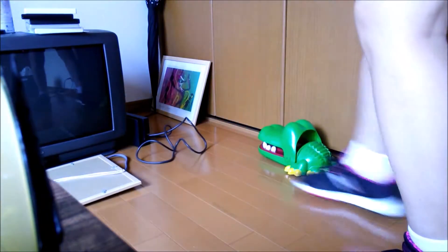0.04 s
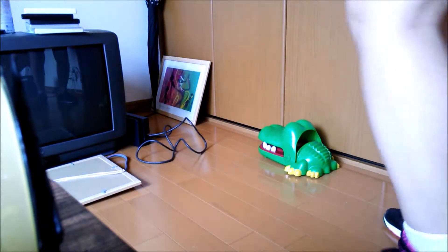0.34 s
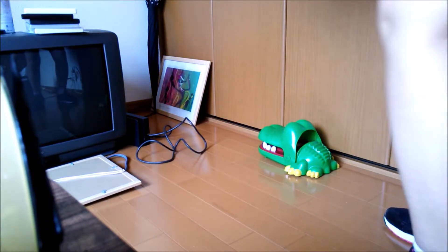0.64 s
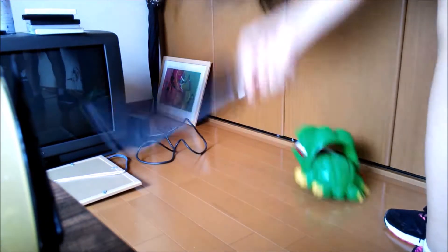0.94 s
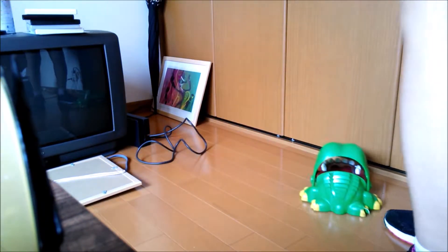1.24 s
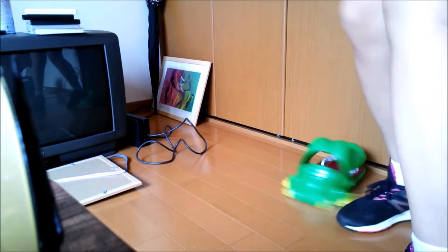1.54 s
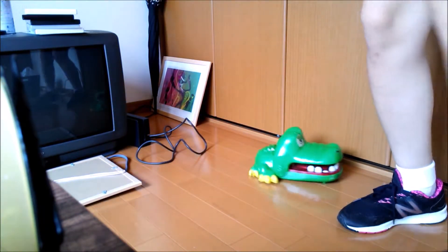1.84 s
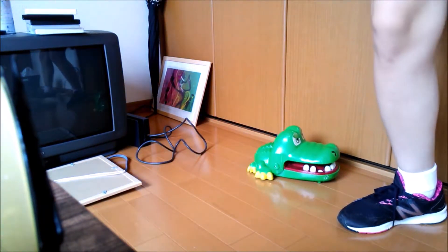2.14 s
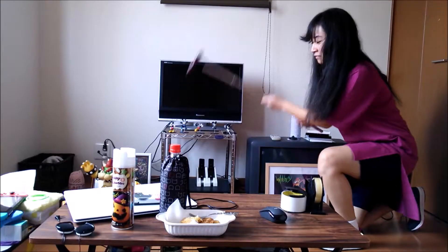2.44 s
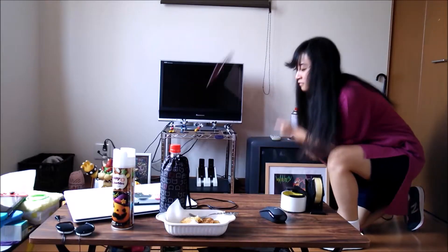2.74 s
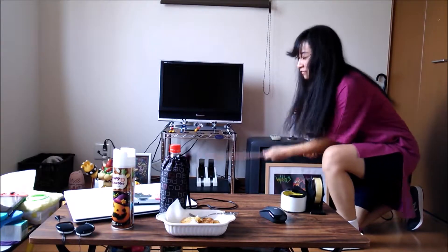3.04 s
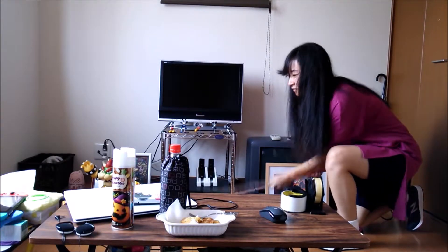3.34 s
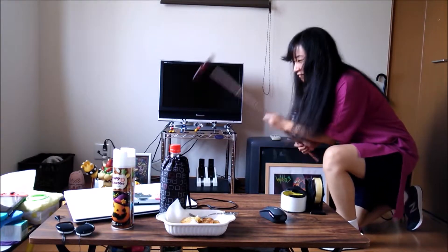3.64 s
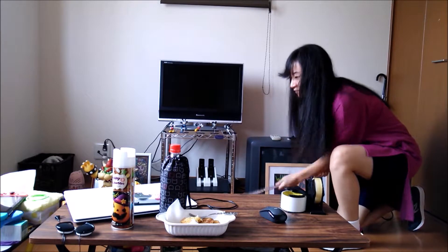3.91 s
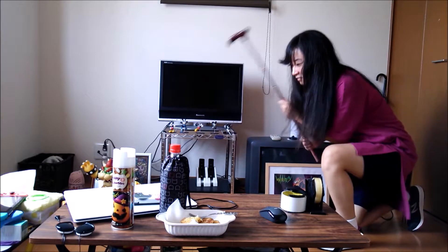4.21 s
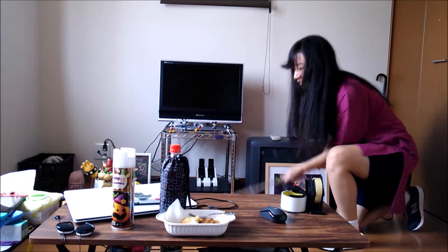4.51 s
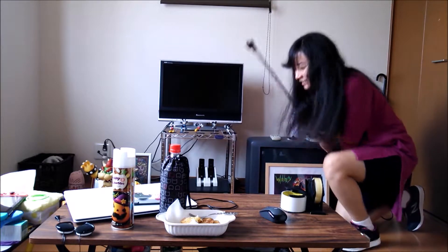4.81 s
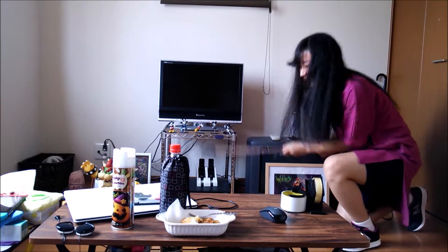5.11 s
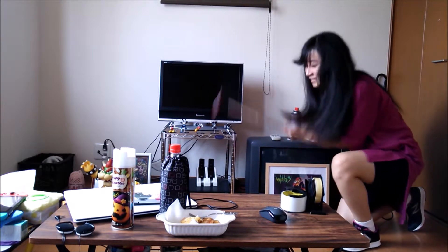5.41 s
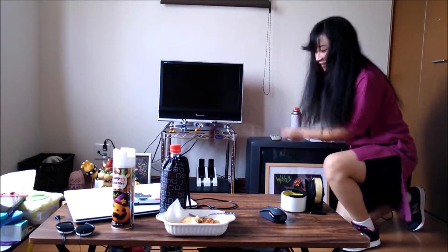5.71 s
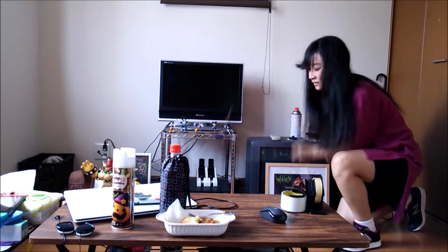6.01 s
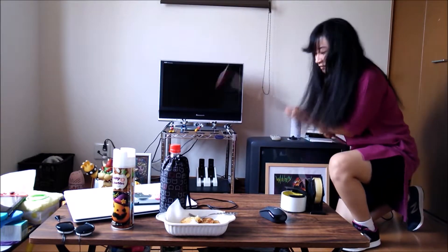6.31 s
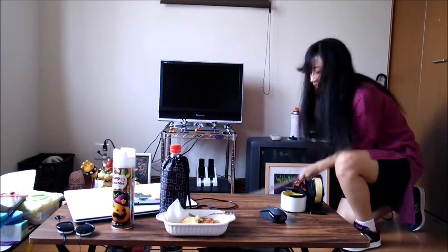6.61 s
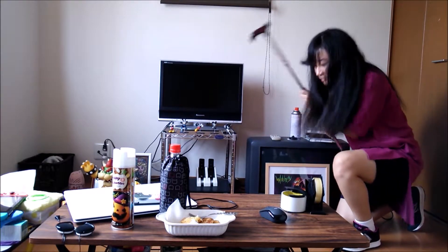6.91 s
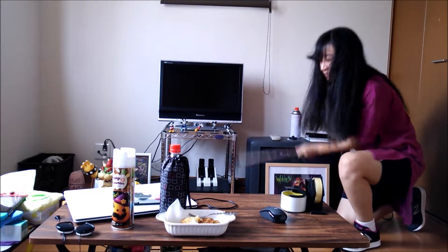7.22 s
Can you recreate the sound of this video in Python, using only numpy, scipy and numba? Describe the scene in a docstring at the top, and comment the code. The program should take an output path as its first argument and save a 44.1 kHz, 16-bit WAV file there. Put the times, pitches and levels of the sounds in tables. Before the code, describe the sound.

A hollow plastic toy clatters across a wooden floor, then takes nine loud, evenly paced hammer blows in a small room.

```python
"""A small bare room with a wooden floor: a hollow plastic toy is flung, nudged with a shoe, then hammered.
Contacts crack the shell and set the room ringing; harder bounces are brighter. After each of nine blows
the toy jumps and lands again. Boards boom under toy and feet, a sole squeaks once, a sleeve rustles.
The microphone is overloaded: its limiter holds loud crashes flat before the room is heard dying away."""
import sys
import numpy as np
from scipy import signal
from scipy.fft import rfft, irfft
from scipy.io import wavfile
from scipy.ndimage import map_coordinates
from numba import njit

SR = 44100
rng = np.random.default_rng(int(sys.argv[2]) if len(sys.argv) > 2 else 0)


def dump(signal):
    """Clip the signal to [-1, 1] and save it as 16-bit WAV at the path in sys.argv[1]."""
    limited = np.clip(np.atleast_2d(signal).T, -1, 1)
    pcm = np.round(limited * 32767).astype(np.int16)
    wavfile.write(sys.argv[1], SR, pcm)


N = 320166
TIME_S = np.arange(N) / SR
RING_S = np.arange(SR) / SR  # time axis of one event
HZ = np.fft.rfftfreq(SR, 1 / SR)
DIP_START_S, DIP_END_S = 2.502, 2.535


def amp(db):
    """Decibels to gain."""
    return 10 ** (np.asarray(db) / 20)


def unit(x):
    """Scale to rms 1."""
    return x / np.sqrt(np.mean(x ** 2) + 1e-20)


def along(points, hz):
    """Interpolate (f/Hz, value) points on a log axis."""
    f, values = np.transpose(points)
    return np.interp(np.log(hz + 1), np.log(f + 1), values)


def add(track, t_s, sound):
    """Mix a sound into the track from t_s."""
    start = max(round(t_s * SR), 0)
    part = sound[:max(N - start, 0)]
    track[start:start + len(part)] += part


def noise(spectrum):
    """Steady coloured noise, rms 1."""
    colour = amp(along(spectrum, np.fft.rfftfreq(N, 1 / SR)))
    return unit(irfft(rfft(rng.standard_normal(N)) * colour, N))


def resonances(modes):
    """Sum of resonance peaks in dB, from rows of f/Hz, width/Hz, level/dB."""
    return sum(db / (1 + (2 * (HZ - hz) / width_hz) ** 2) for hz, width_hz, db in modes)


def tilt(db_oct):
    """Brightness slope in dB about 1500 Hz."""
    return db_oct * np.log2(np.maximum(HZ, 200) / 1500)


def upper_modes(spacing_hz):
    """Spectral ripple: each contact rings the shell's many upper modes at random strengths."""
    strengths = rng.standard_normal(2048)
    return map_coordinates(strengths, [HZ / spacing_hz], mode='mirror') * np.minimum(HZ / 1500, 1)


# room decay: f/Hz, t60/s
ROOM_DECAY = [(80, 0.41), (210, 0.27), (560, 0.57), (1470, 0.53), (3880, 0.54), (10200, 0.37),
              (15000, 0.12)]


def crash(colour_db, rise_s=0.00085, early_db=-2, early_t60_s=0.19, early_db_oct=2,
          snap_db=-3, snap_t60_s=0.016, ripple_db=4.5):
    """One contact: a snap, early reflections, then dense room echoes whose top dies first."""
    colour = amp(colour_db + 3.2 * upper_modes(spacing_hz=75))
    late, early = rfft(rng.standard_normal((2, SR))) * colour
    hz, t, frames = signal.stft(unit(irfft(late, SR)), SR, nperseg=512)
    decay = amp(-60 * t / along(ROOM_DECAY, hz)[:, None])
    echoes = signal.istft(frames * decay, SR, nperseg=512)[1][:SR]
    # wide, damped modes of the plastic colour only the first moments
    clack_colour = amp(tilt(early_db_oct) + ripple_db * upper_modes(spacing_hz=140))
    clack = unit(irfft(early * clack_colour, SR))
    clack_envelope = amp(early_db - 60 * RING_S / early_t60_s) + amp(snap_db - 60 * RING_S / snap_t60_s)
    return (echoes + clack_envelope * clack) * (1 - np.exp(-RING_S / rise_s))


# floorboard modes: f/Hz, level/dB, t60/s
BOARD_MODES = [(72.8, -14, 0.65), (116.5, -0.5, 0.17), (138.4, -7, 0.26), (174, -2, 0.17),
               (212.6, -0.5, 0.2), (263.3, -8.5, 0.14)]


def boom(hardness_db_oct, scatter_db=4, detune=0.036, rise_s=0.0016):
    """Boards ring in a few low modes; hard contacts favour the upper ones."""
    out = np.zeros(SR)
    for hz, db, t60_s in BOARD_MODES:
        level_draw, pitch_draw = rng.standard_normal(2)
        start_db = db + hardness_db_oct * np.log2(hz / 200) + scatter_db * level_draw
        mode_hz = hz * (1 + detune * pitch_draw)
        out -= amp(start_db - 60 * RING_S / t60_s) * np.sin(2 * np.pi * mode_hz * RING_S)
    return out * (1 - np.exp(-RING_S / rise_s))


# narrow shell resonances: f/Hz, width/Hz, level/dB
SHELL_MODES = [(90, 29, 4), (151, 26, 8), (397.5, 38, 8.5), (530, 120, 6.5), (722.2, 37, 10), (766, 12, 5),
               (854.5, 62, 7.5), (1016, 77, 6), (1153, 68, 6), (1512, 49, 2), (1570, 15, 7.5),
               (2070, 130, 2.5), (2270, 80, 2.5), (2495, 21, 0.5), (2910, 83, 3), (3650, 26, 10.5),
               (4270, 92, 3), (5230, 89, 3)]


def shell():
    """Resonance curve of the hollow shell, in dB."""
    return resonances(SHELL_MODES)


# spectrum of toy on floor: f/Hz, level/dB
BOUNCE_SPECTRUM = [(25, -4), (120, 3), (300, 2.5), (480, -0.5), (680, 1.5), (1200, 1), (2000, -3.5),
                   (3500, -10.5), (5500, -11.5), (7500, -20), (9800, -22.5), (13500, -42)]
# bounces and nudges: t/s, level/dB, relative thud/dB
BOUNCES = [(0.0, -18, -17), (0.8629, -7.5, -0.5), (0.916, 2, -11), (0.973, 1, -6), (1.015, 4.5, -22.5),
           (1.089, 1, -1), (1.165, 5, -11), (1.274, -6.5, 2), (1.335, -13.5, -1), (1.598, -19, 0),
           (1.623, -19.5, -5), (1.668, -13, 0), (1.69, -14.5, -3), (1.81, -22, -18)]


def tumbling():
    """Each bounce clacks the shell, quicker and brighter when harder, and thuds the boards."""
    out = np.zeros(N)
    colour_db = along(BOUNCE_SPECTRUM, HZ) + 0.65 * shell()
    for t_s, db, thud_db in BOUNCES:
        clack = crash(colour_db + tilt(1.47 + 0.11 * db), rise_s=0.0025 / amp(0.36 * db),
                      early_db=-4, early_t60_s=0.38, early_db_oct=1, snap_db=-9.5, ripple_db=3)
        thud = amp(thud_db - 3) * boom(hardness_db_oct=-1)
        add(out, t_s, amp(db) * (clack + thud))
    return out


# room tone spectrum: f/Hz, level/dB
TONE_SPECTRUM = [(25, 1), (60, 3.5), (120, -3.5), (220, -16.5), (600, -14), (1500, -36), (4000, -42.5),
                 (9500, -40), (13000, -62)]
# room tone envelope: t/s, level/dB
TONE_ENVELOPE = [(0, -30), (.7, -49), (0.819, -48), (2.2, -46), (2.6, -50), (2.95, -58), (4.899, -47),
                 (7.26, -49)]


def room_tone():
    """Low room rumble under a faint hiss."""
    return noise(TONE_SPECTRUM) * amp(np.interp(TIME_S, *np.transpose(TONE_ENVELOPE)))


# spectrum of sole on wood: f/Hz, level/dB
SCUFF_SPECTRUM = [(40, -14), (200, 2), (380, 5.5), (600, 0.5), (1400, -10), (3000, -18.5), (8000, -46.5),
                  (14000, -55.5)]
# footfalls and the toy's landing: t/s, level/dB
THUMPS = [(0.303, -33.5), (0.371, -37.5), (0.556, -30), (0.8635, -8), (0.879, 4.5), (2.169, -39.5),
          (2.24, -51), (2.369, -32.5), (2.423, -29)]


def thumps():
    """Weight booms the boards: heavy contacts are harder, light ones scuffier."""
    out = np.zeros(N)
    for t_s, db in THUMPS:
        scuff = amp(-18 + 0.85 * db) * crash(along(SCUFF_SPECTRUM, HZ), early_db_oct=0)
        add(out, t_s, amp(db) * boom(hardness_db_oct=4 + 0.2372 * db) + scuff)
    return out


def noise_bursts(bursts, length_s, width_oct, rise_s=0.0064, fade_t60_s=0.32):
    """Short bursts of noise, each in its own band."""
    out = np.zeros(N)
    envelope = np.minimum(RING_S / rise_s, 1) * amp(-60 * np.maximum(RING_S - length_s, 0) / fade_t60_s)
    for t_s, db, hz in bursts:
        band = 1 / (1 + (np.log2((HZ + 1) / hz) / width_oct) ** 4)
        band_noise = unit(irfft(rfft(rng.standard_normal(SR)) * band, SR))
        add(out, t_s, amp(db) * envelope * band_noise)
    return out


# sole squeak, then toy knock: t/s, level/dB, f/Hz
SQUEAK_AND_KNOCK = [(0.31, -52, 3600), (2.166, -49, 1343)]


def squeak_and_knock():
    """Short narrow-band sounds: a high sole squeak, then a light ringing knock of the toy."""
    return noise_bursts(SQUEAK_AND_KNOCK, length_s=0.019, width_oct=0.12)


# air pushed at the microphone: t/s, length/s, level/dB
PUFFS = [(0.927, 0.071, 3.5), (4.566, 0.086, 1.5)]


def puffs():
    """One slow swing of air pressure at violent contacts."""
    out = np.zeros(N)
    for t_s, length_s, db in PUFFS:
        cycles = RING_S / length_s
        add(out, t_s, -amp(db) * np.sin(2 * np.pi * cycles) * np.exp(-cycles) * (cycles < 1))
    return out


# spectrum of hammer on toy: f/Hz, level/dB
BLOW_SPECTRUM = [(25, -6.5), (80, -3), (150, -8.5), (220, -4.5), (290, -3), (470, -11.5), (650, -5),
                 (1000, -5.5), (1400, -7), (2400, -6.5), (3500, -14), (5800, -13), (7500, -20.5),
                 (9800, -22.5), (13500, -38)]
# broad resonances of the shell's main parts: f/Hz, width/Hz, level/dB
PART_MODES = [(420, 340, -0.5), (1210, 360, 1.5), (2300, 320, -1)]
# hammer blows: t/s, level/dB, toy's flight/s, belly ring/dB, sleeve rustle/dB
BLOWS = [(3.0358, -2.5, .06, 1.5, -61), (3.531, -1, .1, -10.5, -71), (4.067, 2.5, 0.12, -3.5, -61),
         (4.569, 5.5, .14, -0.5, -56), (5.108, 3, 0.12, 7, -44.5), (5.672, 4.5, 0.13, 2, -62),
         (6.222, 2, .11, -0.5, -42.5), (6.737, 2.5, .095, -3.5, -54), (7.2334, 4, .1, 0.5, -61)]


def hammering(graze_lead_s=0.0034, crush_lag_s=0.045, belly_hz=763, belly_width_hz=74):
    """Each blow grazes, cracks the shell and drives it onto the boards; the toy jumps and lands."""
    out = np.zeros(N)
    body_db = along(BLOW_SPECTRUM, HZ)
    add(out, DIP_END_S, amp(-45) * crash(body_db + shell()))  # faint clack ahead of the blows
    broad_db = body_db + tilt(0.99)
    modes_db = shell() + resonances(PART_MODES)
    for t_s, db, flight_s, belly_db, _ in BLOWS:
        # the belly rings more or less by where the hammer lands
        ring_db = modes_db + resonances([(belly_hz, belly_width_hz, belly_db)])
        crack = crash(broad_db + ring_db, early_db=-6.5, early_t60_s=0.12, early_db_oct=1,
                      snap_db=2.5, ripple_db=2.5)
        crush = crash(broad_db + ring_db, early_db=-5.5, early_t60_s=0.11, early_db_oct=1.5,
                      snap_db=-13.5)
        landing = crash(broad_db + 1.055 * ring_db, rise_s=0.0049, early_db=-5, early_t60_s=0.12,
                        early_db_oct=-0.33, snap_db=-8, ripple_db=9)
        thud = amp(-24) * boom(hardness_db_oct=-1.4)
        add(out, t_s - graze_lead_s, amp(db - 36) * crack)
        add(out, t_s, amp(db - 3.5) * (crack + thud))
        add(out, t_s + crush_lag_s, amp(db - 4) * crush)
        add(out, t_s + flight_s, amp(db - 5) * landing)
    return out


def sleeve_swells(lead_s=0.043, half_width_s=0.097):
    """Envelope of the arm's swing, peaking just before each blow."""
    return sum(amp(db) * np.exp(-((TIME_S - t_s + lead_s) / half_width_s) ** 2) for t_s, *_, db in BLOWS)


# cloth spectrum: f/Hz, level/dB
CLOTH_SPECTRUM = [(200, -6), (1000, 0), (2500, 1), (6000, -7), (10000, -8.5), (13500, -26)]


def sleeve():
    """Cloth rustles as the arm swings."""
    return sleeve_swells() * noise(CLOTH_SPECTRUM)


# faster downswings: t/s, level/dB, f/Hz
SWISHES = [(2.957, -48.5, 1900), (4.042, -38, 2050), (4.551, -38.5, 2000), (5.086, -34, 280)]


def swishes():
    """A fast downswing swishes in a wide band."""
    return noise_bursts(SWISHES, length_s=0.04, width_oct=1)


def scene(dip_db=-16):
    """Mono mix; the level dips briefly between tumbling and hammering."""
    before_dip = TIME_S < DIP_START_S
    floor = thumps() * (before_dip | (TIME_S > BLOWS[0][0]))  # muted from dip to first blow
    toy = tumbling() * before_dip + hammering()
    mix = toy + floor + squeak_and_knock() + swishes() + sleeve() + puffs() + room_tone()
    gain = np.where(before_dip | (TIME_S >= DIP_END_S), 1, amp(dip_db))
    return np.tile(mix * gain, (2, 1))


@njit
def follow(level, attack, release):
    """Level detector; attack and release are per-sample coefficients."""
    out = np.empty_like(level)
    held = 0.0
    for i in range(len(level)):
        held += (level[i] - held) * (attack if level[i] > held else release)
        out[i] = held
    return out


def record(dry, limit_db=2, attack_s=0.00005, release_s=0.053, ahead_s=0.0021, sense_hz=400,
           knee=7, top_hz=15900):
    """Look-ahead limiter deaf to the bass, soft clipping, then a dull, band-limited top."""
    mono = dry[0]
    sensed = signal.sosfilt(signal.butter(2, sense_hz, 'high', fs=SR, output='sos'), mono)
    level = follow(np.abs(sensed), 1 / (attack_s * SR), 1 / (release_s * SR))
    level_ahead = np.interp(TIME_S + ahead_s, TIME_S, level)
    limited = mono / (1 + (level_ahead / amp(limit_db)) ** 8) ** (1 / 8)
    clipped = limited / (1 + np.abs(limited) ** knee) ** (1 / knee)
    hz = np.fft.rfftfreq(N, 1 / SR)
    treble_cut = amp(along([(13900, 0), (14300, -13)], hz)) * (hz < top_hz)
    return np.tile(irfft(rfft(clipped) * treble_cut, N), (2, 1))


dry = scene()
out = record(dry)
dump(out)
```